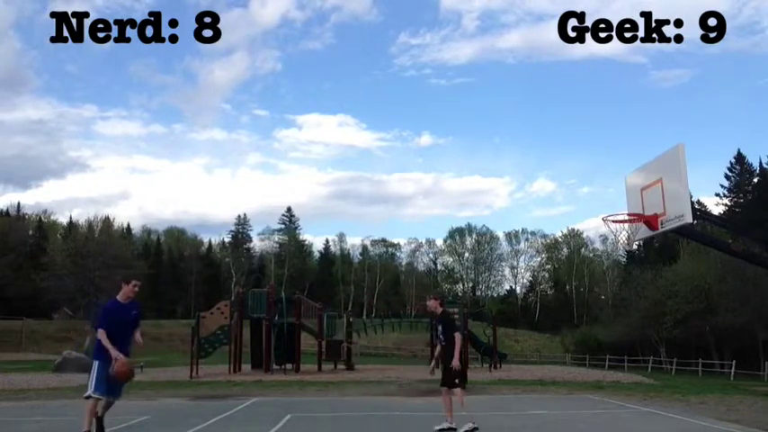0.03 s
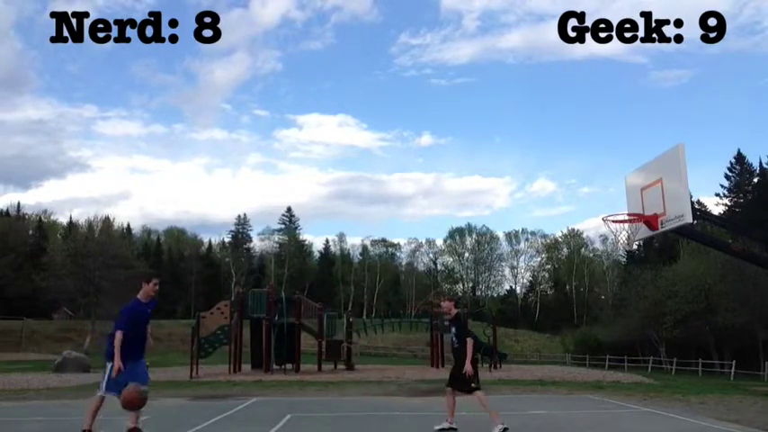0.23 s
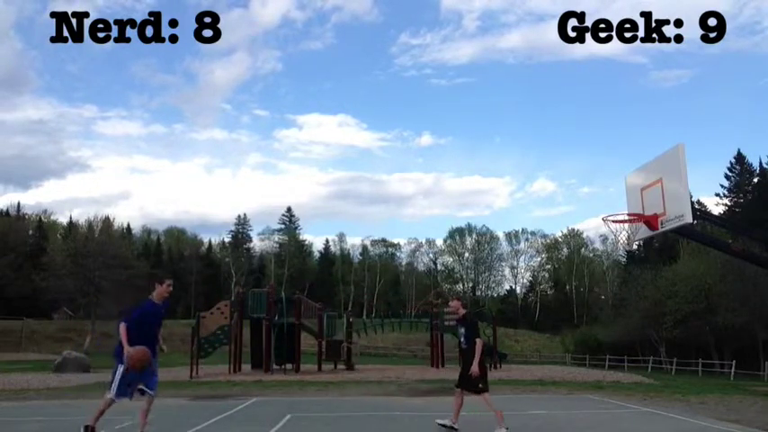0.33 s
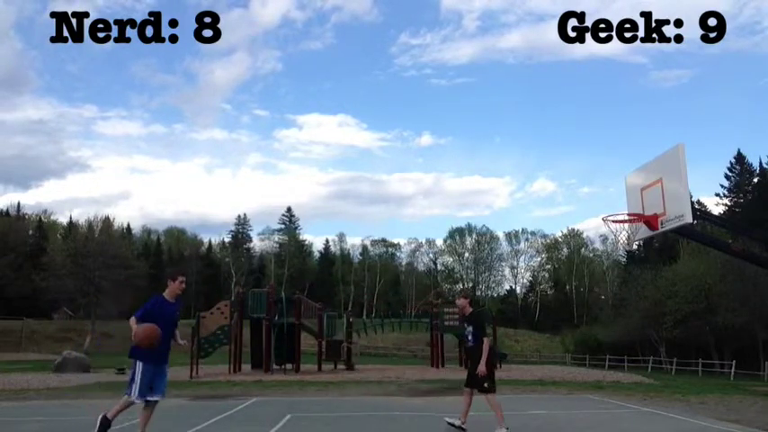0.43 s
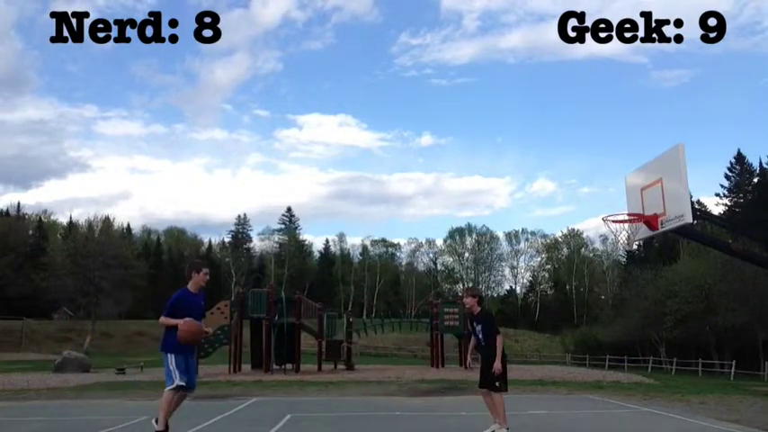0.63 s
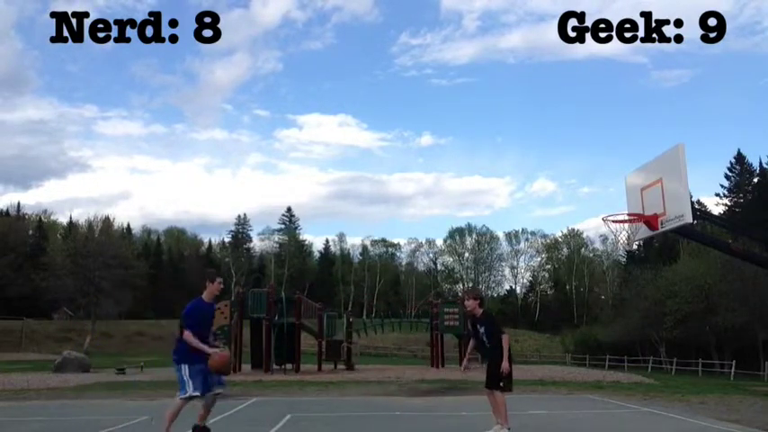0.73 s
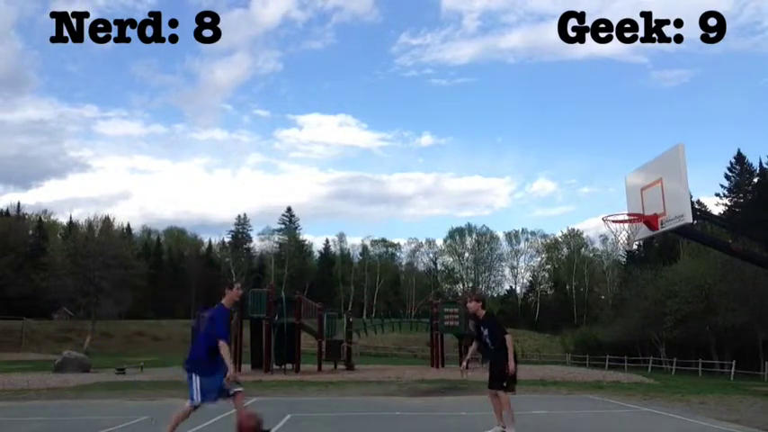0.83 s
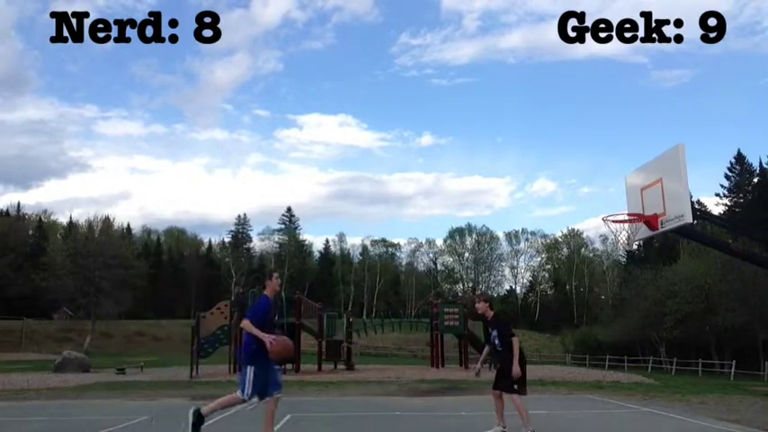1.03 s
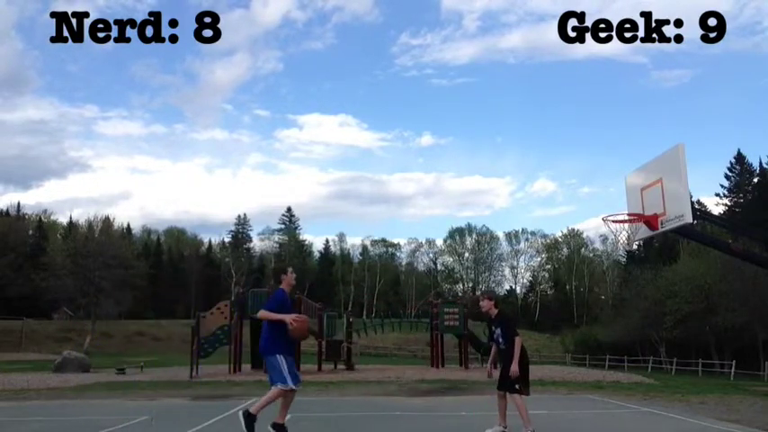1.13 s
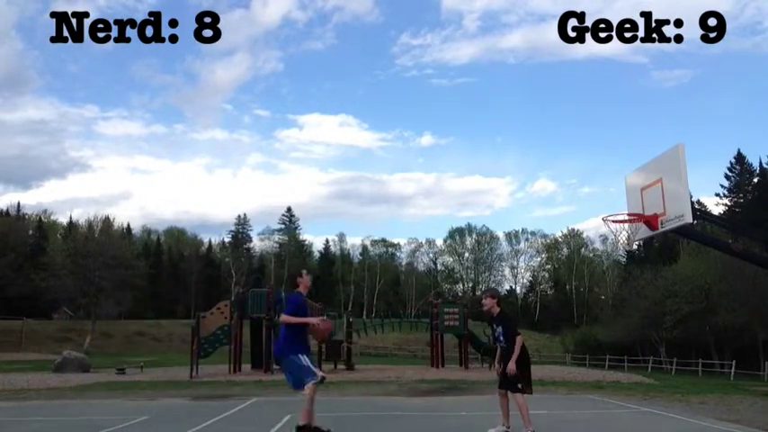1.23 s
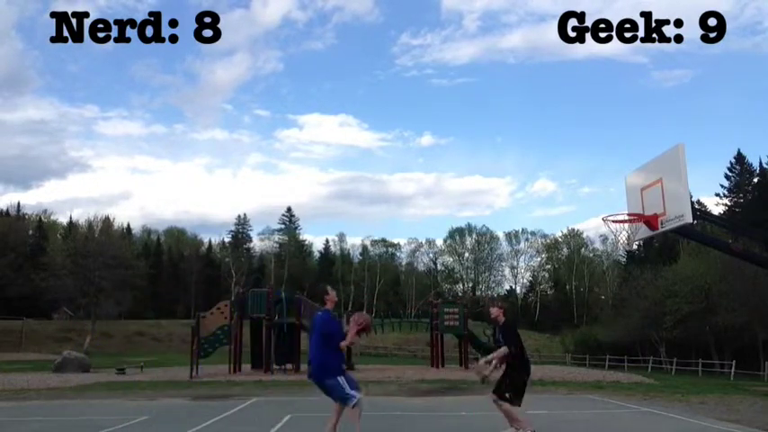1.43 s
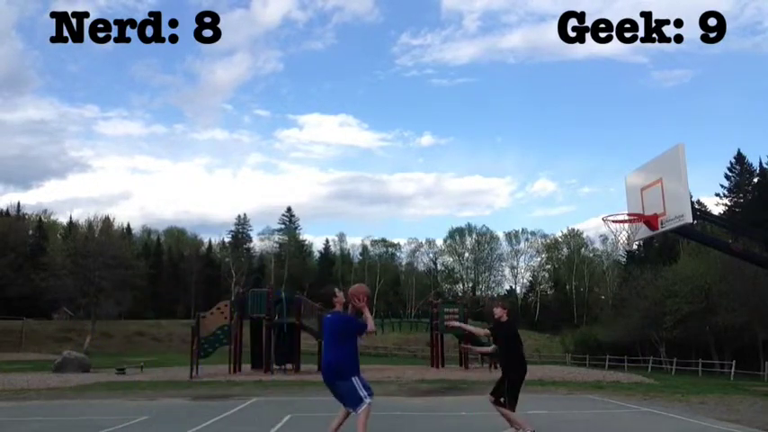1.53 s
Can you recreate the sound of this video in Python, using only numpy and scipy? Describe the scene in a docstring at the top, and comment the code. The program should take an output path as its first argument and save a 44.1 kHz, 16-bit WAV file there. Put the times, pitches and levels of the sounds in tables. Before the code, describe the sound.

A basketball bounces twice on asphalt, each a sharp slap with a faint hollow ring and quick echo. Shoes scuff and pat lightly, then one foot plants with a flat clap. The outdoor court is otherwise quiet.

```python
"""A basketball is dribbled twice on outdoor asphalt, then the player plants a foot to shoot.
Each impact radiates a broadband slap and damped tones: a thump of the rubber shell, a low ringing
and a faint ring of the enclosed air. Shoes pat, scrape and squeak by impact and friction on grit.
A nearby surface returns one clear echo; diffuse reflections add a thin tail over quiet outdoor air."""
import sys
import numpy as np
from scipy import signal
from scipy.fft import rfft, irfft
from scipy.io import wavfile

SR = 44100
rng = np.random.default_rng(int(sys.argv[2]) if len(sys.argv) > 2 else 0)


def master(y):
    """Save y as 16-bit WAV."""
    cut = np.clip(np.atleast_2d(y).T, -1, 1)
    pcm = np.round(cut * 32767)  # scale
    wavfile.write(sys.argv[1], SR, pcm.astype(np.int16))


N = 70560
EVENT_SAMPLES = 12288
T = np.arange(EVENT_SAMPLES) / SR
HZ = np.fft.rfftfreq(EVENT_SAMPLES, 1 / SR)

# Spectrum of the outdoor background (frequency [Hz], relative level [dB])
AIR_SPECTRUM = [(25, -35), (70, -31), (120, -2.5), (220, 2), (450, -9), (1000, -15), (6000, -23.5),
                (14000, -24), (16000, -28.5)]
# Diffuse reflections from far trees (frequency [Hz], gain [dB], decay time T60 [s])
TREE_BANDS = [(70, -44, 0.81), (196, -22.5, 1), (488, -18, 0.79), (1180, -28.5, 1), (3130, -20.5, 1),
              (7500, -30, 0.81)]
# Diffuse reflections from nearby objects (frequency [Hz], gain [dB], T60 [s])
NEAR_BANDS = [(70, -39, 0.066), (150, -7.5, 0.059), (344, -3, 0.097), (1120, -8.5, 0.12),
              (2500, -17.5, 0.06), (6060, -22, 0.12), (14900, -9, 0.09)]
# Weak discrete reflections (delay [s], gain relative to the scatter [dB], treble limit [Hz])
SIDE_ECHOES = [(0.0105, -15.5, 1800), (0.0272, -16.5, 1400)]
# Light footfalls and hand pats
# (time [s], thud level [dB], tap level [dB], tap frequency [Hz], tick level [dB], T60 [s])
PATS = [(0.028, -77, -56.5, 3200, -51, 0.017), (.347, -49, -47, 696, -47, 0.032),
        (0.43, -48.5, -48.5, 1680, -76, .03), (.957, -48, -39.5, 1160, -69, 0.027),
        (1.003, -46, -46, 2180, -47.5, 0.026), (1.061, -43, -66, 497, -60, 0.15),
        (1.144, -42.5, -52.5, 1180, -65, 0.09), (1.182, -51, -60, 1120, -60.5, 0.15),
        (1.276, -44, -55.5, 1200, -71, 0.088), (1.287, -49, -48.5, 380, -73, 0.092),
        (1.579, -46.5, -48, 880, -72, 0.035)]
# Spectrum of friction on grit (frequency [Hz], relative level [dB])
GRIT_SPECTRUM = [(100, -33), (400, -2), (1900, -1), (2500, -3), (4200, 0.5), (6500, -1), (9000, -5.5),
                 (13000, -9.5), (16000, -7.5)]
# Shoe slides (time [s], rise [s], hold [s], release [s], level [dB], tilt [dB/octave],
# rubber resonance [Hz], resonance gain [dB])
SCRAPES = [(0.234, 0.01, 0.077, .12, -55, 2, 6000, -1), (0.604, 0.011, 0.035, 0.085, -39.5, 0.64, 1760, 2),
           (0.668, 0.032, 0.01, 0.056, -38, 0, 3900, 7), (0.721, 0.012, 0.012, 0.088, -46.5, .5, 1440, 6),
           (0.971, 0.0027, 0.014, 0.088, -48.5, 3, 7000, 2),
           (0.999, 0.011, 0.0091, 0.07, -44.5, -2.5, 704, 2.5),
           (1.326, 0.0078, 0.0081, 0.06, -47, -0.5, 7360, 5),
           (1.388, 0.021, 0.035, 0.077, -46, -2.5, 2010, 7)]
# Impact spectrum of a flat sole (frequency [Hz], relative level [dB])
SOLE_SPECTRUM = [(50, -21), (100, -3.5), (180, 15.5), (270, 22), (460, 11), (800, 17), (1080, 16),
                 (1330, 8.5), (2000, 9.5), (2700, -5), (4500, -6.5), (15000, -20)]
# Impact spectrum of the ball (frequency [Hz], relative level [dB])
SLAP_SPECTRUM = [(60, 2.5), (250, 10.5), (450, 5.5), (750, 9.5), (1150, 9), (1400, 11), (2000, 13),
                 (2600, 7), (3300, 10.5), (4000, 2.5), (5900, 8), (7200, 5.5), (15000, -1)]
# Low ringing tones that follow each bounce's thump (frequency [Hz], relative level [dB], T60 [s])
LOW_RING_TONES = [(136.5, -11.5, 0.075), (243, -9, 0.058), (377.4, -19, 0.11), (492.6, -22, 0.11),
                  (562, -22, 0.086), (748, -21, 0.081)]
# Modes of the air inside the ball (frequency [Hz], relative level [dB], T60 [s])
CAVITY_MODES = [(970, -33, 0.095), (1058, -32, 0.086), (1174, -40, 0.086), (1280, -45, 0.092),
                (1405, -39, 0.084), (2010, -42, 0.1), (2774, -46, 0.12), (3170, -48, .07)]
# Ball impacts (time [s], slap gain [dB], thump level [dB], thump frequency [Hz], slap top edge [Hz],
# gain above the edge [dB], scatter gain [dB], notch gain [dB], smack gain [dB], low ring gain [dB],
# cavity ring gain [dB], cavity ring tilt [dB/octave], echo fizz gain [dB])
BOUNCES = [(0.2168, -2.5, -11, 211, 8600, -14, -6, -10.5, 8.5, -11.5, -1, 1.5, -13.5),
           (0.9199, 1.5, -14, 180, 7020, -20.5, -2, 0.5, 5.5, -10.5, 2.5, 2, -14.5)]


def amp(db):
    """Amplitude ratio of a level in decibels."""
    return 10 ** (np.asarray(db) / 20)


def unit(x):
    """Normalisation to rms 1."""
    return x / np.sqrt(np.mean(x ** 2) + 1e-20)


def read(points, hz, column=1):
    """Interpolation of a table column on a log-frequency axis."""
    table = np.array(points)
    return np.interp(np.log(hz + 1), np.log(table[:, 0] + 1), table[:, column])


def later(x, s):
    """Pure delay of s seconds, cut to the input's length."""
    return np.concatenate([np.zeros(max(round(s * SR), 0)), x])[:len(x)]


def placed(x, s):
    """Time shift of an event to s seconds into the scene."""
    return later(np.pad(x, (0, N - len(x))), s)


def highs(x, hz):
    """Second-order high-pass filter."""
    return signal.lfilter(*signal.butter(2, hz, "highpass", fs=SR), x)


def lows(x, hz):
    """First-order low-pass filter."""
    return signal.lfilter(*signal.butter(1, hz, fs=SR), x)


def colour(x, db):
    """Spectral shaping by a gain curve, normalised to rms 1."""
    return unit(irfft(rfft(x) * amp(db), len(x)))


def through(x, response):
    """Convolution with an impulse response, cut to the input's length."""
    return signal.fftconvolve(x, response)[:len(x)]


def dying(t60, t=T):
    """Exponential decay of 60 dB in t60 seconds."""
    return np.exp(-np.log(1000) * t / t60)


def ringing(tones):
    """Superposition of damped sinusoids."""
    return sum(amp(db) * np.sin(2 * np.pi * hz * T) * dying(t60) for hz, db, t60 in tones)


def click(db):
    """Minimum-phase pulse: the most compact causal signal with this spectrum."""
    log_gain = np.log(amp(np.concatenate([db, db[-2:0:-1]])))
    return np.fft.ifft(np.exp(np.conj(signal.hilbert(log_gain)))).real


def through_noise(t60):
    """Exponentially damped white noise of unit energy."""
    burst = rng.standard_normal(EVENT_SAMPLES) * dying(t60)
    return burst / np.linalg.norm(burst)


def air():
    """Stationary coloured noise: the quiet rumble and hiss of the outdoors."""
    spectrum_db = read(AIR_SPECTRUM, np.fft.rfftfreq(N, 1 / SR))
    return amp(-60) * colour(rng.standard_normal(N), spectrum_db)


def diffuse_tail(bands, size):
    """Reverberation: reflections of random phase decay exponentially, each band at its own rate."""
    hz, t, noise = signal.stft(rng.standard_normal(size), SR, nperseg=256)
    t60 = read(bands, hz, column=2)[:, None]
    energy_norm = np.sqrt(2 * np.log(1000) / (t60 * SR))
    field = noise * amp(read(bands, hz))[:, None] * dying(t60, t) * energy_norm
    return signal.istft(field, SR)[1][:size]


def scatter(x, db):
    """Scattering: nearby objects return a short, dense cluster of reflections."""
    return amp(db) * through(x, later(diffuse_tail(NEAR_BANDS, EVENT_SAMPLES), s=0.009))


def pat(s, thud_db, tap_db, tap_hz, tick_db, t60):
    """Soft impact: a thud, a tap and a tick of grit are noise bands whose powers add."""
    thud_hz, tick_hz, rise_s = 216, 4860, 0.0034
    power = 0
    for hz, db in [(thud_hz, thud_db), (tap_hz, tap_db), (tick_hz, tick_db)]:
        octaves = abs(np.log2((HZ + 1) / hz))
        band = unit(amp(-14 * octaves ** 1.15))  # 14 dB down one octave from the centre
        power += (amp(db) * band) ** 2
    noise = irfft(rfft(rng.standard_normal(EVENT_SAMPLES)) * np.sqrt(power))
    envelope = np.minimum(T / rise_s, 1) * dying(t60, np.maximum(T - rise_s, 0))
    return placed(highs(noise * envelope, hz=129), s)


def scrape(s, rise_s, hold_s, release_s, db, tilt_db, rubber_hz, rubber_db):
    """Stick-slip friction: a sole catches on many asphalt grains, and its rubber resonates."""
    grains_per_s, spread_db, rubber_octaves = 9000, 2, 0.44
    slip_hz, slip_db = 160, 2  # bandwidth and depth of the catching and slipping
    signs = rng.choice([-1, 1], EVENT_SAMPLES)
    sizes = amp(spread_db * np.minimum(rng.exponential(1, EVENT_SAMPLES), 4))
    grains = (rng.random(EVENT_SAMPLES) < grains_per_s / SR) * signs * sizes
    wash = 0.46 * rng.standard_normal(EVENT_SAMPLES)
    octaves = np.log2((HZ + 1) / rubber_hz)
    resonance_db = rubber_db / (1 + (octaves / rubber_octaves) ** 2)
    grit = colour(unit(grains) + wash, read(GRIT_SPECTRUM, HZ) + tilt_db * octaves + resonance_db)
    pressure = np.minimum(T / rise_s, 1) * np.clip(1 - (T - rise_s - hold_s) / release_s, 0, 1) ** 2
    jitter = unit(irfft(rfft(rng.standard_normal(EVENT_SAMPLES)) / (1 + (HZ / slip_hz) ** 4)))
    slips = unit(amp(slip_db * jitter))
    return placed(amp(db) * grit * pressure * slips, s)


def squeak(s, length_s=0.034, centre_hz=2050, width_hz=88):
    """Friction squeak: the planted sole slips briefly, giving a faint narrow band of noise."""
    band_db = -20 * np.log10(1 + ((HZ - centre_hz) / width_hz) ** 2)
    whistle = colour(rng.standard_normal(EVENT_SAMPLES), band_db)
    envelope = np.sin(np.pi * np.minimum(T / length_s, 1)) ** 2
    return placed(amp(-45) * whistle * envelope, s)


def stomp(s, pocket_hz=1075, pocket_rise_s=0.0011, crunch_hz=2460):
    """Impact and cavity resonance: a flat sole traps air and crunches grit; reflections follow."""
    pocket = ringing([(pocket_hz, -12, 0.017)]) * (1 - np.exp(-T / pocket_rise_s))
    impact = -click(read(SOLE_SPECTRUM, HZ)) - pocket
    crunch = amp(-2.5) * highs(through(impact, through_noise(t60=0.018)), crunch_hz)
    clap = amp(0.5) * (lows(impact, hz=3700) + crunch)
    fizz = highs(through(clap, through_noise(t60=0.072)), crunch_hz)
    echo = amp(-6.5) * later(lows(clap, hz=840) + fizz, s=0.0166)
    return placed(clap + echo + scatter(clap, db=-5.5), s)


def ball_reflections(ball, slap, fizz_db, scatter_db):
    """Early reflection: one clear echo, dulled but edged with fizz, plus side echoes and scatter."""
    fizz = amp(fizz_db) * highs(through(slap, through_noise(t60=0.018)), hz=2760)
    echo = later(amp(-8) * lows(ball, hz=1350) + fizz, s=0.0162)
    sides = sum(amp(scatter_db + db) * later(lows(ball, hz), delay) for delay, db, hz in SIDE_ECHOES)
    return echo + sides + scatter(ball, scatter_db)


def cavity_ring(gain_db, tilt_db, pivot_hz=1000):
    """Cavity resonance: the ball's faint hollow ring, with its own level and brightness per bounce."""
    return ringing([(hz, db + gain_db + tilt_db * np.log2(hz / pivot_hz), t60)
                    for hz, db, t60 in CAVITY_MODES])


def thump(thump_hz, thump_db, low_ring_db, thump_t60=0.036, rise_s=0.0017):
    """Damped oscillation: the shell gives a short thump, and low ringing tones follow it."""
    tones = ringing([(thump_hz, thump_db, thump_t60)]) + amp(low_ring_db) * ringing(LOW_RING_TONES)
    return highs(tones * (1 - np.exp(-T / rise_s)), hz=101)


def contact_slap(db, edge_hz, over_edge_db, notch_db, smack_db):
    """Impact radiation: brief contact gives a broadband pulse, then rubber skin and grit rattle."""
    notch_hz, notch_width_hz = 4220, 480
    smack_hz, smack_width_hz = 1452, 198  # resonance of the slap
    edge_db = 10 * np.log10(amp(over_edge_db) ** 2 + 1 / (1 + (HZ / edge_hz) ** 28))  # steep shelf
    notch = np.exp(-((HZ - notch_hz) / notch_width_hz) ** 2)
    smack = np.exp(-((HZ - smack_hz) / smack_width_hz) ** 2)
    pulse = -click(read(SLAP_SPECTRUM, HZ) + db + edge_db + notch_db * notch + smack_db * smack)
    rattle = amp(-7) * through(pulse, through_noise(t60=0.017))
    return pulse + rattle


def bounce(s, slap_db, thump_db, thump_hz, edge_hz, over_edge_db, scatter_db,
           notch_db, smack_db, low_ring_db, ring_db, ring_tilt_db, fizz_db):
    """Impulsive excitation: striking the asphalt sets the ball's shell and enclosed air vibrating."""
    slap = contact_slap(slap_db, edge_hz, over_edge_db, notch_db, smack_db)
    ball = slap + thump(thump_hz, thump_db, low_ring_db) + cavity_ring(ring_db, ring_tilt_db)
    return placed(ball + ball_reflections(ball, slap, fizz_db, scatter_db), s)


def scene():
    """Superposition of ball, shoes and open air; far trees return a thin tail of the loud hits."""
    hits = sum(bounce(*row) for row in BOUNCES) + stomp(s=1.3607)
    trees = through(hits, later(diffuse_tail(TREE_BANDS, SR), s=0.04))
    contacts = squeak(s=1.405) + sum(pat(*row) for row in PATS) + sum(scrape(*row) for row in SCRAPES)
    return (hits + trees + contacts + air())[None]


def record(dry, bass_hz=70, top_hz=15450):
    """Band-pass response of the microphone: a bass roll-off and a steep upper limit."""
    thinned = signal.sosfilt(signal.butter(2, bass_hz, "highpass", fs=SR, output="sos"), dry)
    band_limit = signal.firwin(401, top_hz, window=("kaiser", 8), fs=SR)
    return signal.oaconvolve(thinned, band_limit[None], "same")


dry = scene()
out = record(dry)
master(out)
```